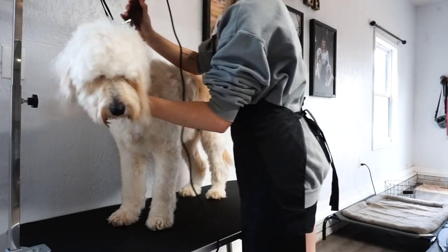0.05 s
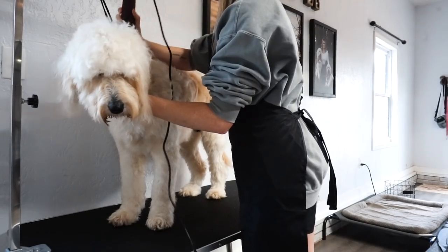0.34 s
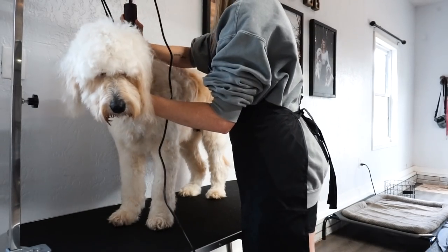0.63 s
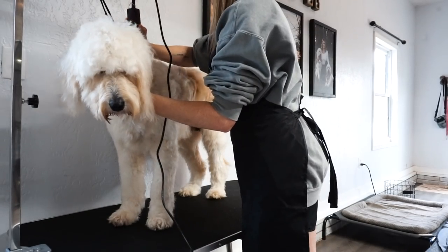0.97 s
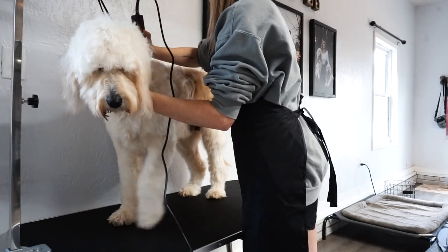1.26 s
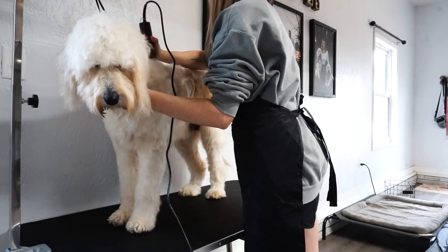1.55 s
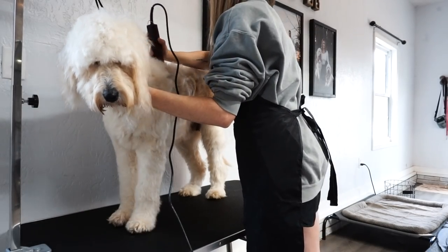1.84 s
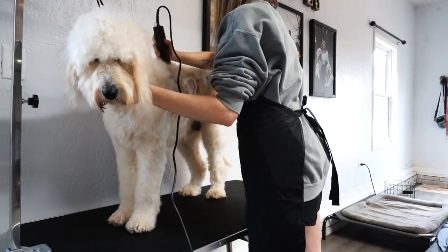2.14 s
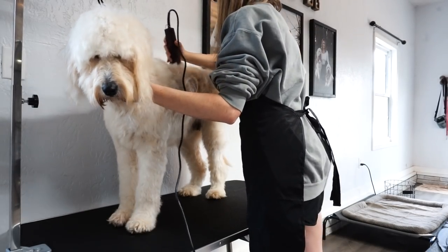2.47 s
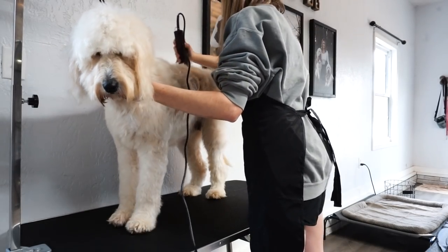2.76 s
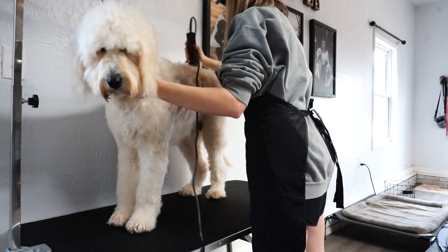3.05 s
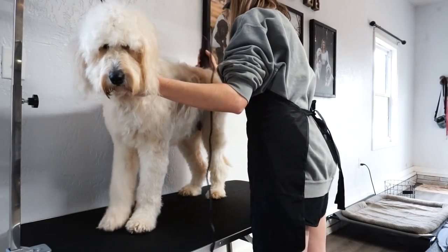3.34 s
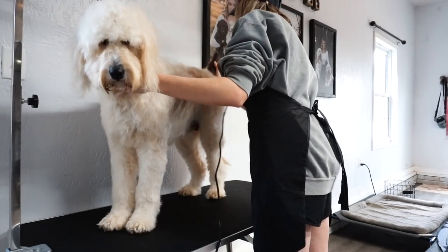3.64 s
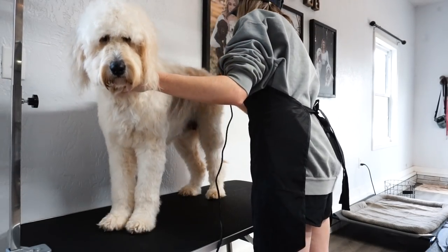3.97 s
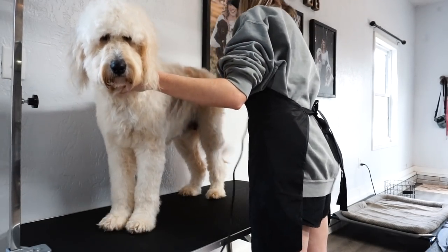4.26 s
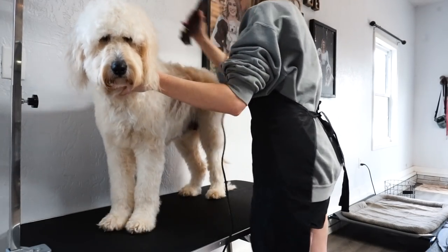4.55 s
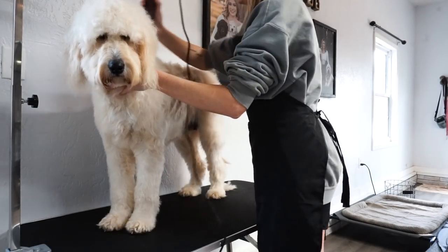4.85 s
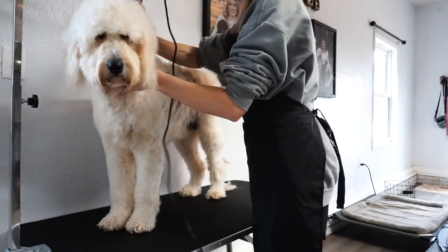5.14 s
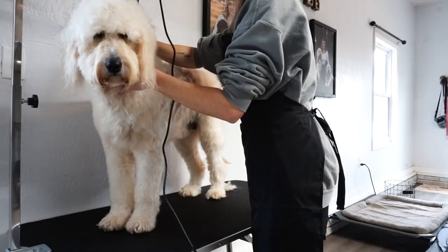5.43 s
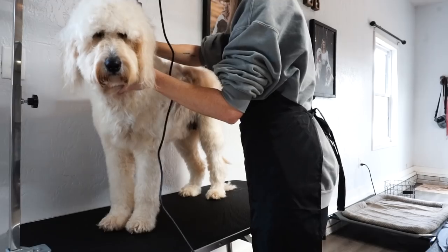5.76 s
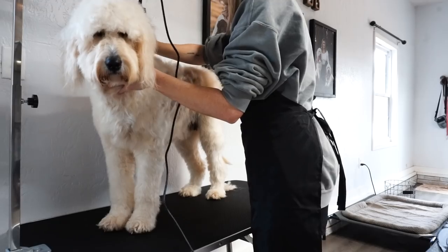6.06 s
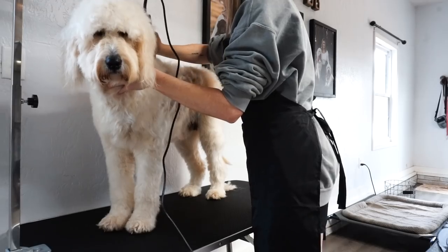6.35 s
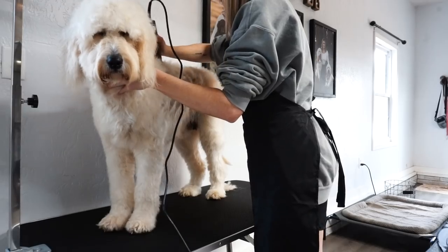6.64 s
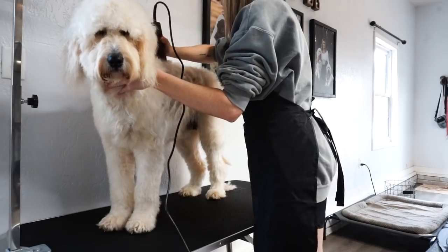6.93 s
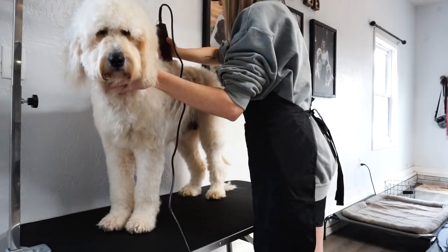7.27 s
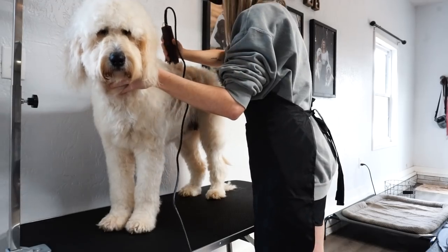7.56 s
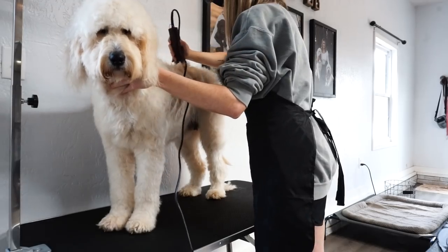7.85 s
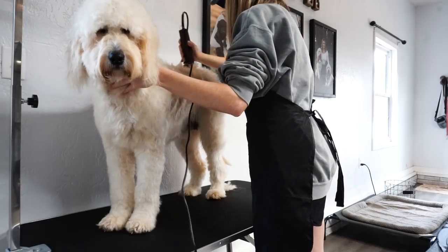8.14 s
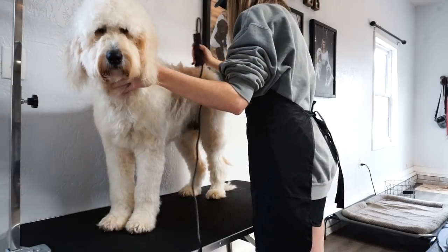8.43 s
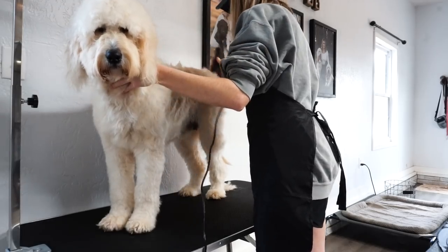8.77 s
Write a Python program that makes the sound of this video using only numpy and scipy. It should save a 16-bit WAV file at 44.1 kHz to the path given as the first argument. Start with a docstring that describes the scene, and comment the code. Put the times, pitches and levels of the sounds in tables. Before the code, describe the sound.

Corded electric clippers buzz steadily through a dog's thick coat, muffled in the fur and clattering brightly when lifted clear.

```python
"""Clipping a dog's coat

Corded electric clippers work through a dog's thick coat in a small, hard-walled room.
The motor hums and throws the steel blade to and fro. The blade sounds muffled and rough in the fur
and clatters brightly when lifted clear. The moving hand keeps shifting the room's echoes,
and twice something knocks softly on the grooming table."""
import sys
import numpy as np
from scipy import signal
from scipy.fft import rfft, irfft, next_fast_len
from scipy.io import wavfile
from scipy.ndimage import uniform_filter1d

SR = 44100
rng = np.random.default_rng(int(sys.argv[2]) if len(sys.argv) > 2 else 0)


def inscribe(sig):
    """Save sig as 16-bit PCM at rate SR to the path in sys.argv[1].

    A 1-D sig is mono; a 2-D sig holds one channel per row.
    Samples are clipped to [-1, 1] before scaling.
    """
    pcm = np.round(np.clip(np.atleast_2d(sig).T, -1, 1) * 32767)
    wavfile.write(sys.argv[1], SR, pcm.astype(np.int16))


N = 392490
TIME = np.arange(N) / SR


def amp(db):
    """Turns decibels into a number to multiply a sound by."""
    return 10 ** (np.asarray(db) / 20)


def unit_level(x):
    """Scales a signal so that its average power is 1."""
    return x / np.sqrt(np.mean(x ** 2) + 1e-20)


def steadied(x, span_s=.12):
    """Holds the power of a stereo sound near 1 from moment to moment."""
    size = round(span_s * SR)
    power = uniform_filter1d(uniform_filter1d((x ** 2).mean(0), size), size)
    return x / np.sqrt(power + 1e-12)


def at_pitch(points, hz):
    """Looks up a table by pitch, spacing the pitches as the ear does."""
    pitch_hz, value = np.transpose(points)
    return np.interp(np.log(hz + 1), np.log(pitch_hz + 1), value)


def curves(rows):
    """Joins a table's points in time with straight lines, one curve for each value column."""
    time_s, *columns = np.transpose(rows)
    return [np.interp(TIME, time_s, column) for column in columns]


def drift(rate_hz):
    """A smooth random wobble, about 1 in size and no faster than rate_hz."""
    t = TIME[::256]
    rates = np.geomspace(rate_hz / 10, rate_hz, 20)
    waves = sum(np.sin(2 * np.pi * (hz * t + rng.random())) / np.sqrt(hz) for hz in rates)
    return np.interp(TIME, t, unit_level(waves))


def add(mix, start, sound):
    """Mixes a stereo sound in, beginning at sample number start."""
    part = mix[:, start:start + sound.shape[1]]
    part += sound[:, :part.shape[1]]


def colour(x, spectrum, size=4096):
    """Makes x ring like an object that favours some pitches, then steadies its level."""
    log_gain = np.log(amp(at_pitch(spectrum, abs(np.fft.fftfreq(size, 1 / SR)))))
    # this filter rings only after a blow, never before it
    ring = np.fft.ifft(np.exp(np.conj(signal.hilbert(log_gain)))).real[:size // 2]
    return steadied(signal.oaconvolve(x, ring[None], axes=1)[:, :N])


def resonance(x, pitch_hz, width_hz, flutter_db=1.0):
    """Makes x ring around a single pitch, with a fluttering level."""
    hz = np.geomspace(100, 16000, 500)
    gain_db = -20 * np.log10(np.minimum(1 + (2 * (hz - pitch_hz) / width_hz) ** 2, 1e3))
    return colour(x, np.transpose([hz, gain_db])) * amp(flutter_db * drift(8))


def tone(turns, harmonic):
    """A pure tone that vibrates a whole number of times (its harmonic) in each turn of the motor."""
    return np.sqrt(2) * np.sin(np.float32(2 * np.pi * (round(harmonic) * turns + rng.random())))


def chord(turns, harmonics, waver_db):
    """Trembling tones trade strength as the hand moves through the room's loud and quiet spots."""
    gains = [amp(db + waver_db * drift(3.5)) for _, db in harmonics]
    tones = [amp(1.3 * drift(12)) * tone(turns, harmonic) for harmonic, _ in harmonics]
    return sum(g * x for g, x in zip(gains, tones)) / np.sqrt(sum(g * g for g in gains))


# The tone colour of the room's air: pitch_hz, level_db
AIR_COLOUR = [(20, -19), (60, -25), (95, -31), (140, 5), (230, 22), (450, 25), (800, 18.5), (2000, -69),
              (15000, -62)]

def air(level_db=-66):
    """The room's air makes a faint, steady rush, nearly the same on both sides."""
    shared, apart = rng.standard_normal(N), rng.standard_normal((2, N))
    return amp(level_db) * colour(shared + 0.34 * apart, AIR_COLOUR)


# How long the room's echo takes to fade by 60 dB: pitch_hz, fade_s
ECHO_FADE = [(250, 0.077), (1000, 0.88), (4000, 0.17), (12000, 0.027)]
# How alike the echo is on the left and right (1 is the same): pitch_hz, likeness
ECHO_LIKENESS = [(200, 0.71), (500, 0.11), (1000, 1), (2000, 0.92), (4000, 0.1), (12000, 0.67)]
# How far the direct sound's wave is ahead on the left: pitch_hz, lead_radians
LEFT_LEAD = [(100, 1.05), (500, 0.27), (1000, 3), (2000, 1.4), (4000, 1.59), (8000, 1.4), (15000, 1.46)]

def room(wet_db, size=10000, direct_size=64):
    """The room's answer to one click: the direct sound, then an echo wet_db stronger than it."""
    hz, t, noise = signal.stft(rng.standard_normal((2, size)), SR, nperseg=256)
    alike = np.clip(at_pitch(ECHO_LIKENESS, hz), -1, 1)[:, None]
    noise[1] = alike * noise[0] + np.sqrt(1 - alike ** 2) * noise[1]
    fade = amp(-60 * t / at_pitch(ECHO_FADE, hz)[:, None])
    echo = signal.istft(noise * fade, SR, nperseg=256)[1]
    echo *= np.minimum(np.arange(echo.shape[1]) / SR / 0.0062, 1)
    path = amp(wet_db) * echo / np.linalg.norm(echo[0])
    lead = at_pitch(LEFT_LEAD, np.fft.rfftfreq(direct_size, 1 / SR))
    path[0, direct_size // 2] += 1
    path[1, :direct_size] += np.roll(irfft(np.exp(-1j * lead)), direct_size // 2)
    return path


def carried(x, wet_db, steps):
    """The hand carries the sound from spot to spot, so each harmonic swells and fades by itself."""
    out, hop = np.zeros((2, N)), N // steps + 1
    for spot in range(steps + 1):
        at = np.arange(max((spot - 1) * hop, 0), min((spot + 1) * hop, N))
        nearness = np.cos(np.pi / 2 * (at / hop - spot))
        add(out, at[0], signal.fftconvolve((x[at] * nearness)[None], room(wet_db[at].mean()), axes=1))
    return out


# Echoes off the arm, the dog and the near wall: delay_s, sway_s, strength
CLOSE_ECHOES = [(.0019, .00022, .2), (.0037, .00035, -.2), (.0066, .0005, .18)]

def sliding_echoes(x):
    """Close echoes slide as the hand moves, so patches of the buzz surge and fade."""
    out, at = x.copy(), np.arange(N)
    for delay_s, sway_s, strength in CLOSE_ECHOES:
        earlier = at - SR * (delay_s + sway_s * drift(1.6))
        out += strength * np.array([np.interp(earlier, at, channel) for channel in x])
    return out


# The notes of the table top: pitch_hz, level_db, fade_s
TABLE_NOTES = [(390, -12, .07), (560, -7, .05), (700, 5, .022), (840, 6, .016), (950, 3, .017),
               (1350, -8, .025)]
# Soft knocks, the second one a quick double: start_s, level_db
TABLE_KNOCKS = [(.244, -28), (5.085, -22), (5.146, -33)]
# A hard tick just before the second knock: start_s, level_db, pitch_hz, fade_s
HARD_TICKS = [(5.052, -30, 3100, .02)]

def table_knocks(cut_hz=380):
    """Light knocks ring the thin table top, which gives off no bass; a hard tick joins them."""
    out, t = np.zeros((2, N)), np.arange(SR // 5) / SR
    ring = sum(amp(db - 60 * t / fade_s) * np.sin(2 * np.pi * hz * t) for hz, db, fade_s in TABLE_NOTES)
    ring = signal.sosfilt(signal.butter(4, cut_hz, "high", fs=SR, output="sos"), ring)
    for start_s, db in TABLE_KNOCKS:
        knock = amp(db) * ring / abs(ring).max()
        add(out, round(start_s * SR), signal.fftconvolve(knock[None], room(wet_db=-11), axes=1))
    for start_s, db, hz, fade_s in HARD_TICKS:
        tick = amp(db - 60 * t / fade_s) * np.sin(2 * np.pi * hz * t) * np.minimum(t / .001, 1)
        add(out, round(start_s * SR), signal.fftconvolve(tick[None], room(wet_db=4.5), axes=1))
    return out


# Passes of the blade through the coat: start_s, end_s, load_0_to_1
COAT_PASSES = [(.5, 4.02, .9), (5.47, 8.4, .5)]

def coat_load(bite_s=0.15, idle_load=0.1):
    """How hard the blade works: the load rises as it sinks into fur and falls as it comes clear."""
    load = np.full(N, idle_load)
    for start_s, end_s, depth in COAT_PASSES:
        inside_s = np.minimum(TIME - start_s, end_s - TIME)
        load += (depth - idle_load) * np.clip(.5 + inside_s / bite_s, 0, 1)
    return np.clip(load, 0, 1)


def pass_swell(swell):
    """Each pass crosses the same loud spot in the room, so a sound swells at the same point of it."""
    base_db, rise_db, after_s, half_width_s = swell
    nearness = sum(np.maximum(1 - abs(TIME - start_s - after_s) / half_width_s, 0)
                   for start_s, _, _ in COAT_PASSES)
    return amp(base_db + rise_db * nearness)


# How harmonic 2 and the low group swell in a pass: base_db, rise_db, after_s, half_width_s
SECOND_HARMONIC_SWELL = (-93, 24.5, 1.15, .7)
LOW_HUM_SWELL = (-76.5, 14.5, 2, 2.5)
# The hum's three groups of tones: harmonic, relative_db
LOW_HUM = [(1, -34), (3, -14), (4, 10.5)]
MIDDLE_HUM = [(6, 3), (7, 10), (8, 8.5)]
UPPER_HUM = [(9, 7.2), (10, 9.3), (11, 3.8), (12, 2.1)]
# How the hum rises and falls: time_s, fifth_harmonic_db, middle_db, upper_db
HUM_LEVELS = [(0.0, -54, -57, -58), (0.3, -56, -50, -51.5), (0.96, -55.5, -61, -56.5),
              (1.53, -54, -56.5, -49.5), (2.2, -53.5, -55, -47.5), (3.1, -53, -57, -55.5),
              (3.47, -56.5, -58, -50.5), (3.75, -59.5, -52, -48.5), (4.35, -54, -59, -52),
              (4.88, -50, -59, -52), (5.13, -51.5, -51, -49), (5.48, -58, -50.5, -51.5),
              (5.87, -53.5, -51, -55), (8.18, -53, -62, -55.5), (8.63, -48, -53, -53),
              (8.9, -51.5, -57, -57)]

def motor_hum(turns, upper_trim_db=-2):
    """The spinning motor hums in clean, low tones at multiples of its speed."""
    fifth_db, middle_db, upper_db = curves(HUM_LEVELS)
    out = pass_swell(SECOND_HARMONIC_SWELL) * tone(turns, harmonic=2)
    out += amp(fifth_db) * tone(turns, harmonic=5)
    out += pass_swell(LOW_HUM_SWELL) * chord(turns, LOW_HUM, waver_db=10.0)
    out += amp(middle_db) * chord(turns, MIDDLE_HUM, waver_db=4)
    out += amp(upper_db + upper_trim_db) * chord(turns, UPPER_HUM, waver_db=4)
    return out * amp([[.15], [-.15]])  # slightly louder on the left


def strokes(turns, blows, back, jitter_s, uneven_db, scrape, scrape_turns, rub, slack_s=0):
    """Uneven blows repeat each turn, dragging scrapes of noise; back scales all but a turn's first."""
    clicks, scrape_power, nearby = np.zeros(N), np.zeros(N), np.arange(-8, 9)
    for k, (share, strength) in enumerate(blows):
        strength = strength * np.ones(N) * (back if k else 1)
        hit_s = np.interp(np.arange(int(turns[-1])) + share, turns, TIME)
        hit_s += slack_s * np.interp(hit_s, TIME, drift(9))  # a loose part drifts early and late
        late, force = rng.standard_normal((2, N // 400))[:, :len(hit_s)]
        place = (hit_s + late * np.interp(hit_s, TIME, jitter_s)) * SR
        at = place.astype(int)[:, None] + nearby
        size = np.interp(hit_s, TIME, strength) * amp(uneven_db * force)
        # sinc lets a click land between two samples
        np.add.at(clicks, at % N, size[:, None] * np.sinc(at - place[:, None]))
        scrape_power += strength ** 2 * np.exp(-((turns - share) % 1) / scrape_turns)
    scraping = np.sqrt(scrape_power + rub) * rng.standard_normal(N)
    return unit_level(clicks) + scrape * unit_level(scraping)


# The lever's blows in one turn (minus is the other way): share_of_turn, strength
LEVER_BLOWS = [(0.01, 0.95), (0.232, 0.053), (0.51, -0.38), (0.732, -0.00063)]

def lever(turns, load):
    """The lever that drives the blade knocks one way, then the other, in every turn."""
    knocks = strokes(turns, LEVER_BLOWS, back=.8, jitter_s=8e-6 + 1.8e-5 * load, uneven_db=1,
                     scrape=.2 + .38 * load, scrape_turns=.08, rub=.26)
    return carried(knocks, wet_db=2 * load - 1, steps=40)


# Tone colours of the plastic shell, its nose and the motor's whirr: pitch_hz, level_db
SHELL_COLOUR = [(480, -46), (700, -7.5), (900, 0), (1100, 3), (1380, 2), (1520, -13.5), (1800, -42.5)]
NOSE_COLOUR = [(1200, -48.5), (1450, -8.5), (1570, 3), (1700, 4.5), (1850, 9.5), (1990, 1.5), (2120, -34),
               (2500, -56.5)]
WHIRR_COLOUR = [(1500, -27.5), (2500, -25), (3200, -1), (4500, 0.5), (6500, -12.5), (8000, -5),
                (11000, -27)]
# How the shell's ring swells in a pass: base_db, rise_db, after_s, half_width_s
SHELL_RING_SWELL = (-5.5, 1.5, .55, 1.15)
# Tones that stand out in the shell, the nose and the blade's heel (its back): harmonic, relative_db
SHELL_TONES = [(14, -3), (17, 1), (19, -1), (21, -5), (22, -5), (23, -4), (25, 0)]
NOSE_TONES = [(25, 0), (27, -1), (29, -5)]
HEEL_TONES = [(31, -5), (33, 0), (35, -3), (37, -5)]
# How each part rises and falls: time_s, level_db
SHELL_LEVELS = [(0.03, -39.5), (0.55, -40.5), (0.72, -37), (0.99, -36.5), (1.38, -36.5), (1.5, -36.5),
                (1.65, -38), (2.6, -38.5), (4.39, -40), (4.58, -40), (5.35, -40), (6.2, -38), (7.24, -39),
                (7.96, -42.5), (8.65, -37.5), (8.87, -38.5)]
HOLLOW_LEVELS = [(0, -51), (.6, -53), (1.1, -43.5), (1.7, -52.5), (3.2, -47.5), (4.6, -48.5), (5.0, -62),
                 (5.4, -54), (5.9, -46.5), (6.35, -46.5), (6.62, -42.5), (6.9, -48), (7.35, -45),
                 (7.9, -57.5), (8.9, -48.5)]
NOSE_LEVELS = [(0, -43), (.42, -44), (.57, -47), (.7, -41.5), (.9, -45), (1.02, -48), (1.2, -45),
               (1.5, -42), (1.75, -45), (2.2, -46.5), (2.42, -51), (2.9, -44), (3.3, -48.5), (3.7, -46.5),
               (4.15, -47), (4.35, -50), (4.6, -43), (5.1, -44.5), (5.35, -45.5), (5.6, -50), (6.3, -49),
               (6.6, -47), (7.3, -46), (7.95, -54.5), (8.42, -48.5), (8.6, -48.5), (8.8, -51), (8.9, -46)]  # comes and goes as the clippers are turned
HEEL_LEVELS = [(0, -44), (.45, -63), (1.8, -47), (2.45, -38), (2.9, -46), (3.3, -49), (3.9, -49),
               (4.2, -40.5), (4.45, -35.5), (4.65, -41.5), (4.85, -40), (5.15, -42), (5.6, -46), (6.4, -54),
               (6.62, -47), (7.05, -56), (7.25, -45), (7.9, -45), (8.3, -50), (8.5, -41.5), (8.6, -35),
               (8.7, -36), (8.77, -39), (8.84, -34), (8.9, -40)]
NOSE_TONE_LEVELS = [(0, -43), (.45, -44), (.55, -62), (6.4, -62), (6.8, -49), (7.35, -50), (7.7, -64),
                    (8.45, -58), (8.58, -43), (8.75, -42.5), (8.9, -49)]  # loudest away from the coat
WHISTLE_LEVELS = [(0, -54), (.6, -62), (1.2, -70), (4.3, -60), (4.48, -43), (4.62, -41), (4.92, -45.5),
                  (5.0, -54), (5.4, -54), (6, -64), (8.9, -73)]  # strongest in free air

def housing(turns, knocks, singing_db=-13, whirr_db=-48.5, nose_trim_db=3.5):
    """The lever's knocks ring the plastic shell, its nose and the blade's heel; the motor sings along."""
    out = pass_swell(SHELL_RING_SWELL) * amp(drift(8)) * colour(knocks, SHELL_COLOUR)
    out += amp(singing_db) * chord(turns, SHELL_TONES, waver_db=2.5)
    out *= amp(curves(SHELL_LEVELS)[0])
    out += amp(curves(HOLLOW_LEVELS)[0]) * resonance(knocks, pitch_hz=850, width_hz=260)
    nose = .9 * colour(knocks, NOSE_COLOUR) + .35 * chord(turns, NOSE_TONES, waver_db=3)
    heel = .8 * resonance(knocks, pitch_hz=2080, width_hz=340)
    heel += .6 * chord(turns, HEEL_TONES, waver_db=2.5)
    out += amp(curves(NOSE_LEVELS)[0] + nose_trim_db) * nose + amp(curves(HEEL_LEVELS)[0]) * heel
    out += amp(curves(NOSE_TONE_LEVELS)[0]) * tone(turns, harmonic=29)
    out += amp(whirr_db) * colour(knocks, WHIRR_COLOUR)
    return out + amp(curves(WHISTLE_LEVELS)[0]) * tone(turns, harmonic=15)


# The high tones of the freely ringing steel: harmonic, relative_db
STEEL_TONES = [(58, -12), (59, -3), (60, 0), (61, 3), (62, -3), (63, -6), (64, 0), (66, -14), (84, -14),
               (85, -9), (86, -11)]
# How the blade's clean tones rise and fall: time_s, plate_db, ring_db
FREE_BLADE_LEVELS = [(0, -47, -36), (.41, -46, -35.5), (.48, -56, -62), (4.0, -57, -64), (4.15, -47, -43),
                     (4.25, -49, -37), (4.38, -49, -46), (4.5, -43, -34), (4.78, -42, -36), (4.9, -49, -39),
                     (5.05, -40.5, -37.5), (5.24, -38, -35), (5.4, -44, -43), (5.55, -60, -57),
                     (8.35, -60, -62), (8.62, -46, -43), (8.9, -48, -52)]

def free_blade(turns, back, lead_radians=1.6, crest_turns=.17):
    """Clear of the fur, the steel rings in clean tones; the return stroke weakens the odd harmonics."""
    plate_db, ring_db = curves(FREE_BLADE_LEVELS)
    left_lead = np.array([[lead_radians], [0]])
    ring = np.zeros((2, N))
    for harmonic, db in STEEL_TONES:
        gain = amp(db + 1.5 * drift(9)) * (1 - back * (harmonic % 2))
        phase = 2 * np.pi * ((harmonic * (turns - crest_turns)) % 1)
        ring += gain * np.cos(np.float32(phase + left_lead))
    ring = amp(ring_db + drift(10)) * steadied(ring)
    return ring + amp(plate_db + drift(12)) * tone(turns, harmonic=37)


def chatter(x, longest_s=.004, spacing_hz=260):
    """Thin steel bends and holds each pitch back by its own short time, so a click becomes a burst."""
    size = next_fast_len(N + 1024)
    hz = np.fft.rfftfreq(size, 1 / SR)
    bends_hz = np.arange(0, SR / 2, spacing_hz)
    delay_s = np.interp(hz, bends_hz, longest_s * rng.random(len(bends_hz)))
    lag_cycles = np.cumsum(delay_s) * hz[1]
    return irfft(rfft(x, size) * np.exp(-2j * np.pi * lag_cycles), size)[:N]


def follow_clatter(rule, clatter_db, load, usual_db=-40):
    """The strength of a lesser sound that grows with the clatter and can be muffled by the coat."""
    base_db, slope, loss_db = rule
    return amp(base_db + slope * (clatter_db - usual_db) - loss_db * load)


# The blade's blows in one turn: share_of_turn, strength
BLADE_BLOWS = [(0.039, 0.3), (0.287, 0.34), (0.539, 0.72), (0.779, 0.11)]
# Tone colours of the blade's flat plate, two rings, teeth, overtone and hiss: pitch_hz, level_db
PLATE_COLOUR = [(1700, -41.5), (2050, -8), (2220, -7.5), (2350, -4), (2500, -5.5), (2700, -6.5), (2950, -7),
                (3200, -19.5), (3800, -37.5)]
RING_COLOUR = [(2700, -45), (3250, -20), (3560, -12), (3680, -3), (3800, 0), (3920, -.5), (4060, -5),
               (4650, -26), (5400, -45)]
UPPER_RING_COLOUR = [(3500, -40), (3820, -10), (3920, -2), (4040, 0), (4180, -9), (4650, -14), (5400, -40)]
TEETH_COLOUR = [(4000, -27), (4750, 0.5), (5050, -4.5), (5320, 8), (5650, 6), (6500, 2.5), (7200, -8),
                (8500, -1), (11000, -37.5)]
OVERTONE_COLOUR = [(6300, -59), (7500, 2.5), (8100, 2.5), (8450, 10), (8900, 0), (9600, -16), (11500, -7.5),
                   (14000, -37)]
HISS_COLOUR = [(4500, -30), (7000, 3), (8300, .5), (10500, 0), (12500, -3), (14000, -3), (15800, -4)]
# The tones of the blade's whine: harmonic, relative_db
WHINE_TONES = [(31, -2), (33, -4), (35, -5), (38, -4), (40, -3), (43, -4), (46, -2), (47, -3), (48, -6)]
# The clatter, loud in the air and muffled in the coat: time_s, plate_db, ring_db
CLATTER_LEVELS = [(0, -35.5, -33), (0.42, -34.5, -36), (0.5, -34.5, -38.5), (0.85, -36.5, -38.5),
                  (1.02, -39, -45), (1.15, -37, -39.5), (1.9, -38.5, -41.5), (2.12, -39.5, -37),
                  (2.3, -39.5, -41.5), (2.9, -37, -41), (3.3, -43.5, -45), (3.45, -37, -38.5),
                  (3.62, -40, -45), (4.05, -40.5, -43.5), (4.11, -40, -37.5), (4.24, -38, -39.5),
                  (4.38, -39, -35.5), (4.5, -33, -32), (4.8, -33, -32.5), (4.92, -35, -34),
                  (5.28, -33.5, -35), (5.42, -38, -41), (5.52, -45.5, -49.5), (8.3, -44.5, -48.5),
                  (8.42, -41, -42), (8.6, -39, -44.5), (8.9, -36.5, -43)]
# How much of the ringing goes to the upper ring: time_s, share_0_to_1
UPPER_RING_SHARE = [(0, .3), (.8, .33), (1.3, .4), (2.1, .2), (4.3, .25), (4.6, .35), (5.4, .35), (7, .55),
                    (8.6, .62)]
# How the rougher sounds rise and fall: time_s, level_db
SIZZLE_LEVELS = [(0, -37.5), (.47, -46.5), (1.01, -48), (1.15, -43.5), (1.35, -41), (1.68, -50),
                 (1.9, -42.5), (2.25, -44.5), (2.37, -39), (2.55, -43), (2.9, -41), (3.28, -51),
                 (3.45, -41), (3.62, -55), (4.05, -56), (4.13, -43), (4.3, -47), (4.48, -37), (4.8, -40.5),
                 (5.05, -47), (5.3, -44), (5.5, -53.5), (8.25, -53.5), (8.45, -46.5), (8.9, -51)]  # flares as the teeth meet fur or run free
RASP_LEVELS = [(.5, -65), (.8, -57), (1.5, -52), (1.7, -61), (5.5, -55), (5.65, -43.5), (6.5, -46),
               (6.9, -54), (8.9, -53)]  # the bite early in each pass
HISS_LEVELS = [(0.0, -54.5), (0.62, -59), (1.81, -59), (3.22, -56), (3.89, -63.5), (4.64, -53.5),
               (5.57, -59.5), (6.79, -59), (8.55, -57), (8.9, -66)]
# How lesser sounds follow the clatter: base_db, db_per_clatter_db, full_load_loss_db
TEETH_RULE = (-44, 0.46, -0.29)
OVERTONE_RULE = (-50, 1.26, 46)
WHINE_RULE = (-48, 0.9, 16)

def blade(turns, load, back, knocks, plate_trim_db=-2, ring_trim_db=1.7, sizzle_trim_db=1, hiss_trim_db=8):
    """The steel blade clacks to and fro; fur roughens the blows and muffles the whine and overtone."""
    plate_db, ring_db = curves(CLATTER_LEVELS)
    upper = curves(UPPER_RING_SHARE)[0]
    clacks = strokes(turns, BLADE_BLOWS, back, jitter_s=1e-5 + 1.6e-5 * load, uneven_db=1.3,
                     scrape=.14 + .5 * load, scrape_turns=.15, rub=.035, slack_s=3e-5)
    sliding = strokes(turns, BLADE_BLOWS, back, jitter_s=1.2e-5 + 8e-6 * load, uneven_db=1.6,
                      scrape=2.8, scrape_turns=.13, rub=.08)
    wet_db = 8 * load - 5.5  # buried in the coat, the blade is heard mostly by way of the walls
    clacks = carried(chatter(clacks), wet_db, steps=22)
    sliding = carried(sliding, wet_db + 9, steps=6)
    cutting = clacks + .45 * load * sliding
    plate_blows = (1.25 - back) * knocks + .7 * cutting
    out = amp(plate_db + plate_trim_db + .6 * drift(8)) * colour(plate_blows, PLATE_COLOUR)
    for share, spectrum in (1 - upper, RING_COLOUR), (upper, UPPER_RING_COLOUR):
        out += np.sqrt(share) * amp(ring_db + ring_trim_db + .5 * drift(10)) * colour(cutting, spectrum)
    sizzle = resonance(cutting, pitch_hz=5330, width_hz=620)
    rasp = resonance(knocks + .15 * sliding, pitch_hz=1400, width_hz=300)
    out += amp(curves(SIZZLE_LEVELS)[0] + sizzle_trim_db) * sizzle + amp(curves(RASP_LEVELS)[0]) * rasp
    out += follow_clatter(TEETH_RULE, ring_db, load) * colour(clacks + 0.28 * sliding, TEETH_COLOUR)
    overtone = (0.79 + 0.68 * back) * colour(clacks + .5 * sliding, OVERTONE_COLOUR)
    out += follow_clatter(OVERTONE_RULE, ring_db, load) * overtone
    out += follow_clatter(WHINE_RULE, plate_db, load) * chord(turns, WHINE_TONES, waver_db=3.5)
    out *= amp(.4 * drift(11))  # the clatter flutters a little
    hiss = colour(sliding + 1.6 * rng.standard_normal((2, N)), HISS_COLOUR)
    return out + amp(curves(HISS_LEVELS)[0] + hiss_trim_db) * hiss


# The motor's speed, which sags when it works hard: time_s, speed_hz
MOTOR_SPEED = [(0, 62.62), (0.5, 62.68), (0.75, 62.17), (1.25, 62.17), (1.5, 61.74), (1.95, 62.46),
               (2.3, 62.25), (3.7, 62.29), (3.85, 62.06), (4.2, 62.9), (5.4, 63.22), (5.75, 62.9),
               (6.6, 62.72), (6.85, 62.89), (8.9, 62.77)]
# How hard the blade strikes on its way back: time_s, strength_0_to_1
RETURN_STROKE = [(.4, 0.1), (.6, 0.54), (3.8, 0.46), (4.2, 0.92)]
# The clippers wander to the right along the dog's back: time_s, left_minus_right_db
BALANCE = [(0, -1.1), (1.7, -.9), (3.2, -2), (4.3, -1.9), (5.2, -.1), (6.7, -.5), (8.7, -2.3)]

def scene(cut_hz=210):
    """One motor keeps time for the hum, the lever and the blade; the table and the air join in."""
    speed_hz, load, back = curves(MOTOR_SPEED)[0], coat_load(), curves(RETURN_STROKE)[0]
    turns = np.cumsum(speed_hz * (1 + 0.0012 * load * drift(25))) / SR  # motor turns so far
    knocks = lever(turns, load)
    clatter = sliding_echoes(housing(turns, knocks) + blade(turns, load, back, knocks))
    clatter += free_blade(turns, back)
    clatter *= amp(np.outer([.5, -.5], curves(BALANCE)[0]))
    # parts this small give off no bass
    clatter = signal.sosfilt(signal.butter(4, cut_hz, "high", fs=SR, output="sos"), clatter)
    return motor_hum(turns) + clatter + table_knocks() + air()


def record(dry, top_hz=15800):
    """Cuts away the very highest treble."""
    low_pass = signal.firwin(511, top_hz, window=("kaiser", 9), fs=SR)
    return signal.oaconvolve(dry, low_pass[None], "same")


dry = scene()
out = record(dry)
inscribe(out)
```